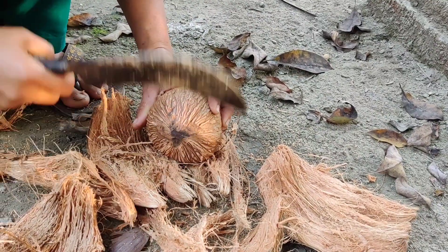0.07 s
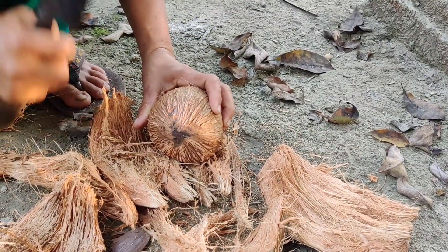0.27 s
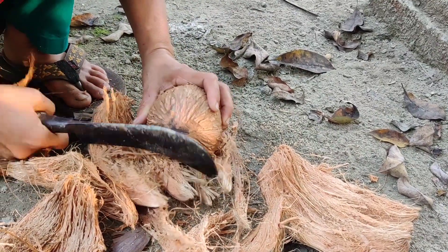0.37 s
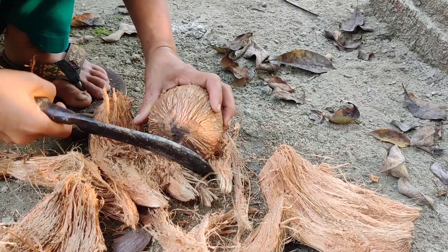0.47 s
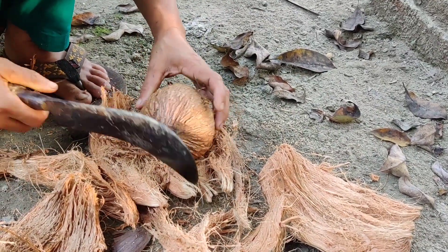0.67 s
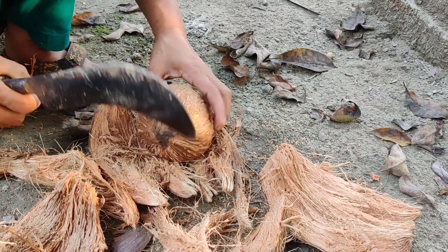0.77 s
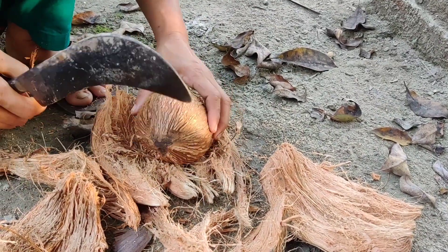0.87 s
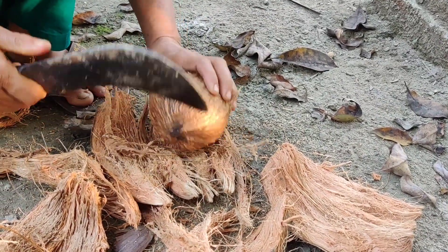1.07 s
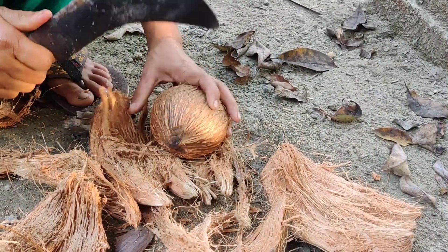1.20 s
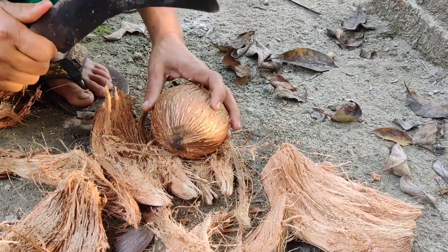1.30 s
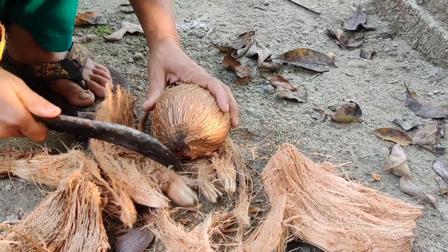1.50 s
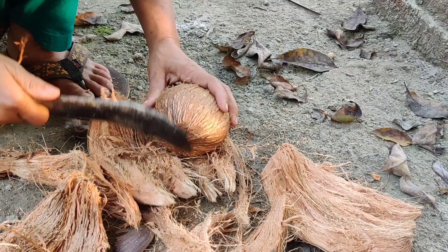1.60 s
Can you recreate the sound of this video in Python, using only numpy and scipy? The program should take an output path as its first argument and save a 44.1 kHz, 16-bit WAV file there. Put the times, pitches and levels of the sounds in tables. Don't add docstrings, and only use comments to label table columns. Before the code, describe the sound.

A heavy blade strikes a coconut at 0.22 and 1.35 seconds: bright, dry cracks with brief steel and shell ringing, quick bounces and low ground thuds. A pebble ticks at 0.03. Bird chirps come near 0.15, a whistle at 1.17. Husk fibres crackle around 0.4-0.55 and 1.0; gritty sweeping peaks at 0.75 and around the second blow. Faint insect, rumble, hiss and distant motor hum, outdoors, close stereo.

```python
import sys
import numpy as np
from scipy import signal
from scipy.fft import rfft, irfft, next_fast_len
from scipy.io import wavfile
from scipy.ndimage import map_coordinates

SR = 44100
rng = np.random.default_rng(int(sys.argv[2]) if len(sys.argv) > 2 else 0)


def dump(signal):
    limited = np.clip(np.atleast_2d(signal).T, -1, 1)
    pcm = np.round(limited * 32767).astype(np.int16)
    wavfile.write(sys.argv[1], SR, pcm)


def volts_from_decibels(level):
    exponent = np.asarray(level, float) / 20
    return 10 ** exponent


N = 72765
RISE_S, LAG_S = 0.0003, 0.0003


def unit(x):
    return x / np.sqrt(np.mean(x ** 2) + 1e-20)


def along(points, hz):
    f, v = np.transpose(points)
    return np.interp(np.log(hz + 1), np.log(f + 1), v)


def wobble(rate):
    knots = rng.standard_normal(int(N * rate / SR) + 4)
    return map_coordinates(knots, [np.arange(N) * rate / SR])


def filtered(x, response):
    m = 2 * next_fast_len(N // 2 + 4096)
    return irfft(rfft(x, m) * response(np.fft.rfftfreq(m, 1 / SR)), m)[..., :N]


def causal(db):
    c = irfft(db * np.log(10) / 20)
    m = len(c) // 2
    folded = np.concatenate([c[:1], 2 * c[1:m], np.zeros(m)])
    return np.exp(rfft(folded))[:len(db)]


# f/Hz, correlation (0 to 1)
LIKENESS = [(60, 0.98), (300, 0.85), (700, 0.3), (1400, 0.066)]


def rush(gain, grit_db):
    def turn(hz):
        return np.arccos(np.clip(along(LIKENESS, hz), -1, 1)) / 2

    grains = rng.standard_normal((2, N)) * volts_from_decibels(grit_db * wobble(700))
    mid, side = filtered(grains, lambda hz: gain(hz) * [np.cos(turn(hz)), np.sin(turn(hz))])
    return unit(np.array([mid + side, mid - side]))


def fade(s, t60, rise):
    t = np.maximum(np.arange(N) / SR - s - np.array([[LAG_S], [0]]), 0)
    return t, volts_from_decibels(-60 * t / t60) * (1 - np.exp(-t / rise))


def ring(s, hz, db, t60, left_db=0, rise=RISE_S, apart=3, shaky_db=4.5, shakes=300):
    out = np.zeros((2, N))
    at = slice(int(s * SR), min(N, int((s + 1.488 * t60) * SR)))
    t = np.maximum(np.arange(N)[at] / SR - s - np.array([[LAG_S], [0]]), 0)
    shake = map_coordinates(rng.standard_normal(200), [np.minimum(shakes * t[1], 190)])
    level = db + np.array([[left_db], [0]]) + shaky_db * shake - 60 * t / t60
    port_phase = apart * rng.uniform(-1.53, 1, (2, 1))
    phase = 2 * np.pi * hz * t[1] + 0.17 * shaky_db * shake[::-1] + port_phase
    out[:, at] = volts_from_decibels(level) * (1 - np.exp(-t / rise)) * np.sin(phase)
    return out


# t/s, level/dB
RUMBLE_SWELL = [(0, -59.5), (.25, -53.5), (.45, -54), (.6, -51), (.75, -51.5), (.9, -52.5), (1.0, -53),
                (1.2, -59.5), (1.42, -53), (1.65, -57)]
# f/Hz, level/dB
RUMBLE_COLOUR = [(20, -3), (45, -1), (120, -3.5), (250, -13), (450, -19), (900, -30)]
# f/Hz, level/dB
HISS_COLOUR = [(150, -7), (330, -7.5), (680, -1), (1000, -5.5), (2000, -8), (4000, -10.5), (7000, -19),
               (16000, -30)]


def yard():
    t = np.arange(N) / SR
    rumble_db = np.interp(t, *np.transpose(RUMBLE_SWELL)) + 1.5 * wobble(14.76)
    rumble = volts_from_decibels(rumble_db) * rush(lambda hz: volts_from_decibels(along(RUMBLE_COLOUR, hz)), grit_db=0.0)
    hiss = volts_from_decibels(-60 + 1.2 * wobble(5.8)) * rush(lambda hz: volts_from_decibels(along(HISS_COLOUR, hz)), grit_db=3)
    insect_hz, width_hz = 4440, 260
    song = rush(lambda hz: 1 / (1 + ((hz - insect_hz) / width_hz * 2) ** 4), grit_db=0)
    fading = volts_from_decibels(-6 * np.clip(t / 0.23, 0, 1))
    return rumble + hiss + volts_from_decibels(-67 + 4.4 * wobble(90)) * fading * song


# t/s, level/dB
MOTOR_SWELL = [(0, -89), (.3, -67.5), (.85, -64.5), (1.1, -68), (1.65, -71.5)]


def motor():
    hum_hz, width_hz = 685, 36
    level_db = np.interp(np.arange(N) / SR, *np.transpose(MOTOR_SWELL))
    return volts_from_decibels(level_db) * rush(lambda hz: 1 / (1 + ((hz - hum_hz) / width_hz * 2) ** 2), grit_db=-2)


# start t/s, length/s, from f/Hz, to f/Hz, level/dB
BIRD_NOTES = [
    (0.13, 0.0054, 5200, 6230, -51),
    (0.141, 0.011, 2250, 2870, -48.5),
    (0.154, 0.0098, 2950, 3660, -46.5),
    (0.14, 0.0073, 4400, 5200, -58),
    (0.145, 0.012, 5100, 5860, -46.5),
    (0.164, 0.036, 4600, 4660, -57),
    (0.165, 0.027, 3950, 4030, -54.5),
    (1.169, .045, 4200, 4520, -54.5),
    (1.616, 0.017, 3700, 3590, -65),
]


def bird():
    t, whistle = np.arange(N) / SR, np.zeros(N)
    for s, length, from_hz, to_hz, db in BIRD_NOTES:
        u = np.clip((t - s) / length, 0, 1)
        hz = from_hz * (to_hz / from_hz) ** u
        tone = np.sin(2 * np.pi * np.cumsum(hz) / SR)
        whistle += volts_from_decibels(db + 1.6 * wobble(220)) * np.sin(np.pi * u ** 1.3) * tone
    echo = rng.standard_normal((2, 6000)) * volts_from_decibels(-60 * np.arange(6000) / SR / 0.18)
    echo = echo / np.linalg.norm(echo[0])
    return whistle + volts_from_decibels(-4.5) * signal.fftconvolve(whistle[None], echo, axes=1)[:, :N]


# peak t/s, level/dB, rise/ms, fall/ms, handle level/dB
BROOM_STROKES = [
    (0.186, -59.5, 66, 75, 7),
    (.28, -45.5, 58, 35, -3),
    (0.338, -41, 46, 63, 4.5),
    (0.756, -33, 131, 111.6, -1.5),
    (1.249, -52, 66, 310, 10),
    (1.336, -38.5, 66.5, 108, -1.3),
    (1.447, -41, 37, 67, 0),
]
# f/Hz, level/dB
BRISTLE_COLOUR = [(300, -32), (1200, -19), (2000, -14), (3300, -11.5), (5000, -8), (7000, -14.5),
                  (11000, -14.5), (16000, -23.5)]
# f/Hz, width/Hz, level/dB
HEAD_MODES = [(4054, 115, 0.5), (4400, 140, -2.5), (4820, 26, -1), (5630, 350, -5.5), (6110, 410, -9),
              (9260, 1230, -8)]
# f/Hz, width/Hz, level/dB
HANDLE_MODES = [(1773, 156, -9), (2169, 87, -2.5), (2393, 280, -10.5), (2855, 71, -7)]


def broom():
    def peaks(modes, f):
        return sum(volts_from_decibels(db) ** 2 / (1 + ((f - c) / w * 2) ** 2) ** 2 for c, w, db in modes)

    t = np.arange(N) / SR
    head_power, handle_power = np.zeros(N), np.zeros(N)
    for s, db, rise_ms, fall_ms, handle_db in BROOM_STROKES:
        away = np.abs(1000 * (t - s) / np.where(t < s, rise_ms, fall_ms))
        swell = volts_from_decibels(db - 10 * away ** 1.78) ** 2
        head_power += swell
        handle_power += swell * volts_from_decibels(handle_db) ** 2
    head = rush(lambda f: np.sqrt(volts_from_decibels(along(BRISTLE_COLOUR, f)) ** 2 + peaks(HEAD_MODES, f)), grit_db=1.0)
    handle = volts_from_decibels(-9.5) * rush(lambda f: np.sqrt(peaks(HANDLE_MODES, f)), grit_db=1.0)
    head = volts_from_decibels(0.41 * wobble(38.9)) * np.sqrt(head_power) * head
    return head + volts_from_decibels(1.1 * wobble(29.95)) * np.sqrt(handle_power) * handle


# t/s, level/dB, f/Hz, t60/s
PEBBLE_TICK = (.0336, -31, 1750, .005)


def pebble():
    s, db, hz, t60 = PEBBLE_TICK
    grain = rush(lambda f: f / (f + 1500) / (1 + (f / 7000) ** 6), grit_db=0)
    out = volts_from_decibels(db - 11) * fade(s, t60, 0.0002)[1] * grain
    for ratio, over_db in [(1, 2), (0.7, -5), (1.5, -6), (2.1, -13)]:
        out = out + ring(s, ratio * hz, db + over_db, t60, rise=0.0002, apart=0.1, shaky_db=0)
    return out


# start t/s, length/s, level/dB
HUSK_RUSTLES = [
    (0.129, 0.033, -56.5),
    (0.275, 0.18, -58),
    (0.411, 0.063, -46.5),
    (0.481, 0.052, -47.5),
    (0.535, .04, -46),
    (0.998, 0.028, -38.5),
    (1.04, 0.1, -47.5),
    (1.52, 0.053, -53.5),
]
# t/s, level/dB
FIBRE_SNAPS = [
    (.4715, -38),
    (.4805, -35),
    (.4895, -38),
    (.5015, -38),
    (.5185, -43),
    (.5525, -37),
    (1.0015, -40),
    (1.0085, -29),
    (1.1185, -39),
    (1.2085, -47),
]
# f/Hz, level/dB
FIBRE_COLOUR = [(150, -21), (900, -11.5), (2500, -11.5), (6000, -14), (8000, -8), (10200, 1.5), (12000, -8),
                (16000, -11.5)]


def husk():
    def colour(hz):
        return volts_from_decibels(along(FIBRE_COLOUR, hz))

    t = np.arange(N) / SR
    rub = np.zeros(N)
    for s, length, db in HUSK_RUSTLES:
        onset = 1 / (1 + np.exp(np.clip((s - t) / 0.0049, -50, 50)))
        rub += volts_from_decibels(db) * onset * volts_from_decibels(-8 * np.maximum(t - s, 0) ** 2 / length ** 2)
    snap = sum(volts_from_decibels(db + 3) * fade(s - 0.001, 0.0077, 0.00021)[1] for s, db in FIBRE_SNAPS)
    dull = rush(lambda hz: 1 / (1 + (hz / 5000) ** 4) * hz / (hz + 800), grit_db=1)
    rustle = rub * volts_from_decibels(2.2 * wobble(79.7)) * rush(colour, grit_db=0.5)
    return rustle + snap * rush(colour, grit_db=2.0) + volts_from_decibels(-28.0) * snap * dull


# t/s, f/Hz, level/dB, t60/s
GROUND_THUDS = [(.222, 121, -40, 1.1), (.2205, 290, -38, .025), (.2345, 250, -37, .04),
                (.253, 230, -42, .04), (.254, 2860, -42, .06), (.538, 420, -48, .03),
                (1.002, 150, -42, .06), (1.349, 250, -37, .04), (1.382, 220, -36, .035),
                (1.352, 120, -41, .9), (1.368, 2790, -29, .045), (1.367, 1875, -33, .06),
                (1.3655, 5700, -30, .015)]


def thuds():
    return sum(ring(*row, rise=0.00043, apart=0.077, shakes=18) for row in GROUND_THUDS)


# t/s, ring level/dB, crack level/dB, tilt/(dB per octave), which blow
CONTACTS = [
    (.2192, -43, -29, -1.5, 0),
    (.2198, -15.5, -13.5, 0, 0),
    (.2346, -30, -35, -8, 0),
    (1.3483, -19, -26, -10, 1),
    (1.3492, -18, -12.5, 0, 1),
    (1.3635, -35, -30, -3, 1),
    (1.3663, -34, -26, -3, 1),
]
# f/Hz, level/dB, left over right/dB, t60/s
BLADE_MODES = [
    [(753, 0, 5.5, 0.023), (1028, -5, 1.5, 0.029), (1197, -3, 3.5, 0.03), (1900, -5.5, 5, 0.03),
     (2903, -3.5, 2.5, 0.031), (3605, -4, -2, 0.048), (4336, -7.5, 4.5, 0.034), (4736, -9.5, 1.5, 0.047),
     (6024, -11.5, 2, 0.054), (8030, 4, -7.5, 0.027), (10080, 8.5, -7, .022), (11880, 13.5, -5, 0.034),
     (14700, -5, 10.5, 0.031), (15860, -6.5, 2.5, .07)],
    [(766, 1, 6, 0.012), (1106, -2.5, 6.5, 0.0094), (1216, -2, -0.5, 0.011), (1820, -8.5, 0, .035),
     (2750, -26, -15, .035), (3540, -7, -3, 0.037), (4430, -2, -7, 0.036), (4760, -6, 1.5, .03),
     (5990, -6, 1.5, 0.0254), (8100, -2, -2, 0.065), (10160, 7, -12, 0.019), (11850, 6.5, 0, .036),
     (13950, 8, 2, 0.021), (14800, -10, -9, 0.027)],
]
# f/Hz, level/dB
CRACK_COLOUR = [(250, -32), (500, -9.5), (1000, -6), (3300, 1), (7000, -4.5), (10000, 1.5), (13000, -10),
                (15500, -11), (16500, -37)]


def blows():
    crack_t60, dust_t60, dust_db = 0.026, 0.22, -18
    env, out = np.zeros((2, N)), np.zeros((2, N))
    for s, ring_db, crack_db, tilt_db, blow in CONTACTS:
        for hz, db, left_db, t60 in BLADE_MODES[round(blow)]:
            level = ring_db + db + tilt_db * max(np.log2(hz / 1500), 0)
            apart = min((hz / 2500) ** 2, 2)
            out += ring(s, hz, level, t60, left_db, apart=apart, shaky_db=3.0, shakes=60 + hz / 30)
        crack = fade(s, crack_t60, RISE_S)[1]
        dust = volts_from_decibels(dust_db) * fade(s, dust_t60, 0.0008)[1]
        env += volts_from_decibels(crack_db) * (crack + dust)
    out += env * rush(lambda hz: volts_from_decibels(along(CRACK_COLOUR, hz)), grit_db=3.5)
    return filtered(out, lambda hz: causal(-10 * np.log10(1 + (600 / (hz + 200)) ** 6)))


def scene():
    return yard() + motor() + bird() + broom() + pebble() + husk() + thuds() + blows()


# f/Hz, level/dB
LEFT_COLOUR = [(600, 1.5), (2500, 3), (5500, 8), (6800, 1), (8500, -8), (10500, -18), (12300, -2),
               (15000, 0)]


def ports(dry):
    return filtered(dry, lambda hz: np.array([causal(along(LEFT_COLOUR, hz)), 1 + 0 * hz]))


def top_cut(x):
    return signal.sosfilt(signal.butter(12, 16960, fs=SR, output="sos"), x)


def record(dry):
    ceiling, top_hz = 0.86, 15850
    x = ports(dry)
    x = x / (1 + np.abs(x / ceiling) ** 6) ** (1 / 6)
    x = filtered(x, lambda hz: 1 / (1 + (hz / top_hz) ** 120) + volts_from_decibels(-34) / (1 + (hz / 16700) ** 120))
    return top_cut(x)


dry = scene()
out = record(dry)
dump(out)
```